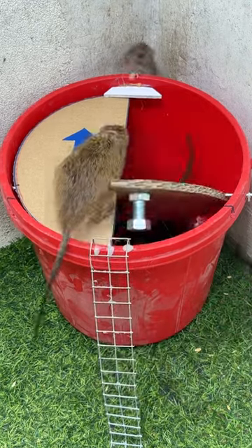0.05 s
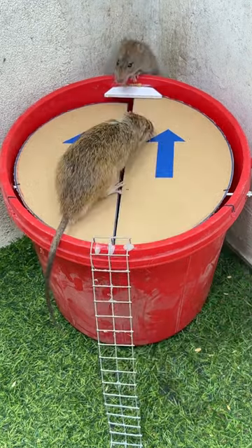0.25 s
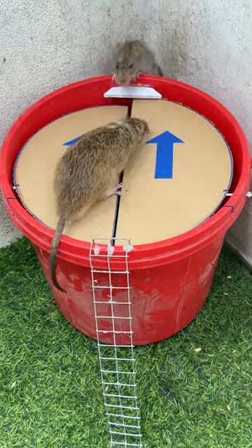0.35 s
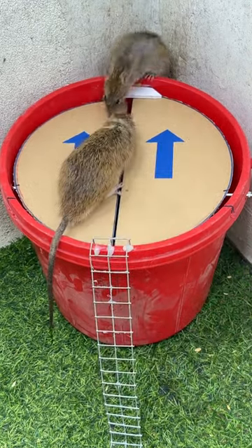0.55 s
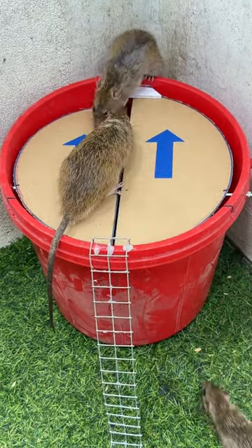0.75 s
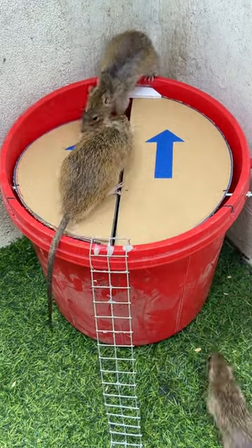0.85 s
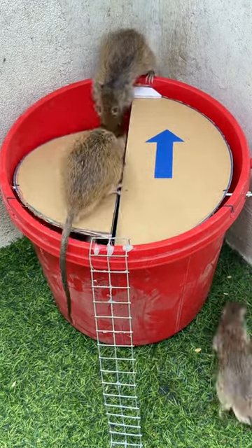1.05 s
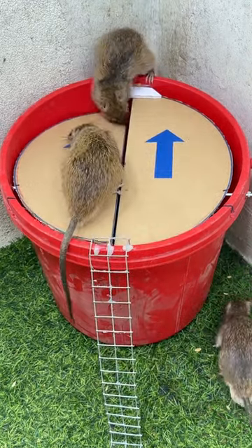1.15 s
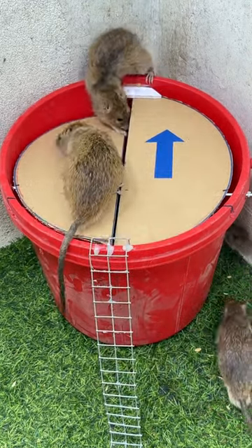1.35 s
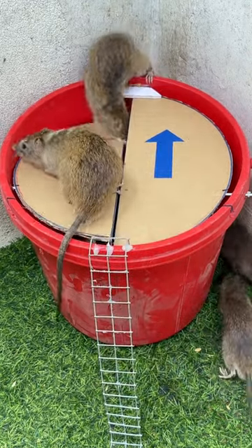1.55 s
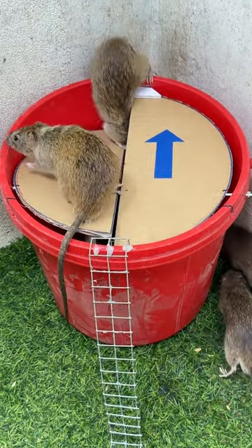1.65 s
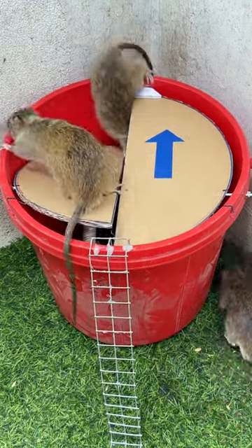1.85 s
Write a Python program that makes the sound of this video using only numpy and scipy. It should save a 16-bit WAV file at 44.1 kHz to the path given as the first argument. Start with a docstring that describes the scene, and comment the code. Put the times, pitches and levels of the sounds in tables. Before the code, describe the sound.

In a walled outdoor corner, a bucket trap's cardboard flap knocks closed and rebounds, its bolt and hinge clattering as the bucket briefly booms. Soft rat steps, claw ticks and rustles follow over a low, steady rumble.

```python
"""A soft knock and a scrape: rats on a bucket trap in a walled corner. The weighted cardboard flap
swings shut and thumps, its bolt and hinge clatter, it rebounds and the plastic bucket booms on.
Then paws pad on the cardboard and claws tick and rustle, over a low outdoor rumble.
Blows are decaying modes; cracks, ticks and rubbing are enveloped, coloured noise."""
import sys
import numpy as np
from scipy import signal
from scipy.fft import rfft, irfft
from scipy.io import wavfile

SR = 44100
rng = np.random.default_rng(int(sys.argv[2]) if len(sys.argv) > 2 else 0)


def wav_record(signal):
    """Record a signal, one row per channel, as 16-bit PCM in the file named by sys.argv[1]."""
    frames = np.transpose(np.atleast_2d(signal))
    bounded = np.clip(frames, -1, 1)
    # unit amplitude maps onto the largest positive 16-bit level
    quanta = np.round(bounded * 32767).astype(np.int16)
    wavfile.write(sys.argv[1], SR, quanta)


N = 83790

# flap landing, rebounding, settling (time [s], board level [dB], bucket level [dB])
FLAP_BLOWS = [(0.0007, -21, -32.2), (0.0505, -66, -30.5), (0.2156, 5, -23), (0.2253, -8, -18),
              (0.26, -15.5, -12.5), (0.2727, -14, -21.5), (0.286, -3.5, -33), (0.3651, -16.5, -28.5),
              (0.3933, -32.5, -26), (0.4972, -52, -32)]
# modes of flap, bucket and wire (frequency [Hz], level [dB], T60 [s])
BOARD_MODES = [(123, -6.5, 0.054), (213.7, 2, 0.052), (247.2, -12, 0.13), (278, -16.0, 0.086)]
BUCKET_MODES = [(86.7, -24, 1), (121.3, -10.5, 0.52), (166.2, -15.5, 0.88), (178, 4, 0.22),
                (235.1, -1.56, 0.22), (299.4, -13.5, 0.68), (528, -17, 0.27), (545, -12.5, 0.15),
                (726.4, -24, 0.17)]
WIRE_MODES = [(2525, 3.5, 0.036), (3920, -14, 0.18), (5540, -18, 0.073), (6150, -7.5, .03),
              (6390, -9, 0.021), (8600, -10, 0.063)]
# bolt and hinge contacts (time [s], level [dB], pitch [Hz])
CLACKS = [(0.049, -28, 2360), (0.2027, -20.5, 1860), (0.208, -19, 1880), (0.217, -13.5, 2072),
          (0.2224, -15, 2120), (0.228, -10, 1517), (0.2402, -15.5, 1557), (0.2524, -18, 2040),
          (0.2558, -16, 2490), (0.2668, -14.5, 2580), (0.2765, -26.5, 1966), (0.325, -28, 1960),
          (1.652, -36.5, 2600), (1.8638, -32.5, 2560)]
# modes of a clack (ratio to pitch, level [dB], T60 [s])
CLACK_MODES = [(0.942, -10, 0.015), (0.998, -0.5, 0.015), (1.28, -22, 0.054), (1.412, -15.5, 0.021),
               (1.65, -13.5, 0.012), (2.4, -20.5, 0.036)]
# wire and claw contacts (time [s], level [dB], tilt [dB/octave])
TICKS = [(0.036, -33, -14.5), (0.2134, -29.5, 3), (0.2217, -26.5, 3), (0.228, -24, 8), (0.255, -33, 3),
         (0.2602, -15, 7.5), (0.2675, -19.5, -4), (0.276, -20, -0.5), (0.326, -25, -13),
         (0.3299, -25.5, 3.5), (0.4329, -31, 1), (0.4925, -34, -0.5), (0.536, -42.5, -5.5),
         (0.944, -44, -3), (0.966, -53, -3), (1.065, -39, 10.5), (1.308, -46.5, 13), (1.652, -47, 8),
         (1.721, -34, 15), (1.8617, -39, -2)]
# steps on the cardboard (time [s], level [dB], pitch [Hz], decay [s])
PAW_STEPS = [(0.001, -25, 247, 0.013), (0.695, -41, 166, 0.052), (1.065, -32, 426, 0.016),
             (1.077, -23, 235, .022), (1.118, -31.5, 232.5, 0.042), (1.164, -35.5, 163, 0.027),
             (1.256, -43, 611, 0.025), (1.335, -34.5, 432, 0.0094), (1.6511, -25, 324, .008),
             (1.694, -39.5, 715, 0.0077), (1.804, -40, 544, 0.039), (1.839, -28, 200, 0.0041)]
# flap on rim; claws and fur on board (time [s], length [s], level [dB], tilt [dB/octave])
SCRAPES = [(0.0, 0.045, -37, 4), (0.049, 0.02, -25.5, 1.5), (0.198, 0.044, -29.5, -2.5),
           (0.255, 0.019, -23, -6), (1.256, 0.059, -49, -3.5), (1.326, 0.057, -37.5, -10),
           (1.694, 0.068, -48.5, -1), (1.80, 0.019, -68, -13)]
RUSTLES = [(0.0, .13, -40, 3.5), (0.134, 0.17, -41, -1.5), (0.704, .10, -51.5, -2), (0.936, 0.049, -55, -2),
           (1.195, 0.45, -62, 0.5), (1.622, 0.14, -50.5, 7), (1.72, 0.084, -53, -0.5),
           (1.795, .028, -37, 2), (1.815, 0.11, -49.5, -0.5)]
# noise spectra (frequency [Hz], relative level [dB])
CRACK_SPECTRUM = [(400, -4), (1000, -2.5), (1700, 3), (2500, 0), (4000, -18.5), (9000, -5), (16000, -60)]
TICK_SPECTRUM = [(800, 1.5), (2500, 0.5), (3300, 3), (4100, -1.5), (4700, 0.5), (6800, 1.5), (9000, -3),
                 (11500, -11), (15500, -10)]
SNAP_SPECTRUM = [(4000, -18), (7000, -12.5), (10000, -6), (13500, 1), (16000, -5.5)]
SCUFF_SPECTRUM = [(100, 9), (300, 10.5), (650, -3), (1000, -24.5), (3000, -30), (8000, -38)]
SCRAPE_SPECTRUM = [(150, 4), (350, 0), (550, 7.5), (800, 6), (1400, -5), (2400, -4.5), (3400, -27.5),
                   (8000, -30.5), (16000, -54)]
RUSTLE_SPECTRUM = [(700, 2), (1500, -1), (2700, 2.5), (4500, -6), (6500, 1.5), (9000, 0.5), (11500, -15.5),
                   (15500, -1.5)]
WALL_SPECTRUM = [(60, -22), (250, 2.5), (600, 0), (2000, -3), (6000, -1.5), (16000, -10.5)]
RUMBLE_SPECTRUM = [(20, -55), (26, -18), (32, 3), (45, 1.5), (70, -3), (110, -10), (170, -9), (300, -13.5),
                   (450, -23), (650, -23), (1100, -33.5), (2800, -39), (4500, -45.5), (7000, -45),
                   (11000, -55.5), (15500, -46.5)]
# stereo width of diffuse sound (frequency [Hz], side level [dB])
SIDE_SPECTRUM = [(50, -68), (170, -32.5), (350, -13), (600, -2.5), (1500, -10.5), (4000, -4.5), (8000, -19),
                 (16000, -25)]
# left microphone port behind the right (frequency [Hz], lag [rad])
PORT_LAG = [(3300, 0), (6000, .8), (8300, 1.93), (11000, 3), (15000, 4)]

TICK_DECAY_S = 0.0028


def flap():
    """Each blow thumps the board and sets the bucket booming."""
    out = 0
    for start_s, board_db, bucket_db in FLAP_BLOWS:
        thump = undb(board_db) * ring(start_s, BOARD_MODES, rise_s=0.0051)
        boom = undb(bucket_db) * ring(start_s, BUCKET_MODES, rise_s=0.0034)
        out += thump + boom
    return out


def hinge(crack_db=-9):
    """Bolt and hinge rattle: each contact cracks and rings at its own pitch."""
    out = 0
    for start_s, db, pitch_hz in CLACKS:
        modes = [(pitch_hz * ratio, mode_db, t60_s) for ratio, mode_db, t60_s in CLACK_MODES]
        crack = undb(crack_db) * noise(CRACK_SPECTRUM) * strike(start_s, rise_s=0.0001, decay_s=0.0034)
        out += undb(db) * (ring(start_s, modes, rise_s=0.0013) + crack)
    return out


def ticks(wire_db=-16):
    """Dry, bright contacts leave a faint ring of wire."""
    out = 0
    for start_s, db, tilt_db_oct in TICKS:
        contact = diffuse(TICK_SPECTRUM, tilt_db_oct) * strike(start_s, 0.00028, TICK_DECAY_S)
        wire = undb(wire_db) * ring(start_s, WIRE_MODES, rise_s=0.00011)
        out += undb(db) * (contact + wire)
    return out


def snap(start_s=0.1458, db=-20.5):
    """Thin, very high click as the flap swings up."""
    return undb(db) * diffuse(SNAP_SPECTRUM) * strike(start_s, 0.00037, TICK_DECAY_S)


def paws(scuff_db=-5.5, rise_s=0.00094):
    """Soft steps: a damped board note and a dull scuff."""
    out = 0
    for start_s, db, pitch_hz, decay_s in PAW_STEPS:
        note = np.sin(2 * np.pi * pitch_hz * since(start_s))
        scuff = undb(scuff_db) * noise(SCUFF_SPECTRUM)
        out += undb(db) * strike(start_s, rise_s, decay_s) * (note + scuff)
    return out


def scrapes():
    """The flap's edge rubs on the rim."""
    return sum(undb(db) * noise(SCRAPE_SPECTRUM, tilt_db_oct) * rub(start_s, length_s)
               for start_s, length_s, db, tilt_db_oct in SCRAPES)


def rustles():
    """Claws and fur brush the board."""
    return sum(undb(db) * diffuse(RUSTLE_SPECTRUM, tilt_db_oct) * rub(start_s, length_s)
               for start_s, length_s, db, tilt_db_oct in RUSTLES)


def walls(x, db=-10.5, t60_s=0.41):
    """Short reverberation of the corner: convolution with decaying noise."""
    tail = diffuse(WALL_SPECTRUM) * strike(0, rise_s=0.0053, decay_s=t60_s / np.log(1000))
    tail /= np.sqrt(np.sum(tail ** 2) / 2)  # mean energy 1 per channel
    return undb(db) * signal.fftconvolve(x, tail, axes=1)[:, :N]


def rumble(db=-40):
    """Steady, low outdoor noise."""
    return undb(db) * diffuse(RUMBLE_SPECTRUM)


def undb(db):
    """Decibels to gain."""
    return 10 ** (np.asarray(db) / 20)


def since(start_s):
    """Seconds since an event, zero before it."""
    return np.maximum(np.arange(N) / SR - start_s, 0)


def onset(start_s, rise_s):
    """Smooth rise from 0 to 1."""
    return 1 - np.exp(-(since(start_s) / rise_s) ** 2)


def strike(start_s, rise_s, decay_s):
    """Quick rise, exponential decay."""
    return onset(start_s, rise_s) * np.exp(-since(start_s) / decay_s)


def ring(start_s, modes, rise_s):
    """Decaying modes set off by one blow."""
    age_s = since(start_s)
    tones = sum(undb(db - 60 * age_s / t60_s) * np.sin(2 * np.pi * hz * age_s) for hz, db, t60_s in modes)
    return onset(start_s, rise_s) * tones


def rub(start_s, length_s, attack_s=0.0037, release_s=0.012, grain_s=0.0017, grain_db=3.5):
    """Attack, grainy hold and release of a sliding contact."""
    attack = np.minimum(since(start_s) / attack_s, 1)
    release = np.exp(-since(start_s + length_s - release_s) / release_s)
    grain = np.interp(since(0) / grain_s, np.arange(N), rng.standard_normal(N))
    return attack * release * undb(grain_db * (grain - 1))


def shape(x, spectrum, tilt_db_oct=0):
    """Filter by a spectrum, tilted above its first point."""
    octave = np.log2(np.maximum(np.arange(N // 2 + 1) * SR / N, 1))
    hz, db = np.array(spectrum).T
    curve_db = np.interp(octave, np.log2(hz), db)
    slope_db = tilt_db_oct * np.maximum(octave - np.log2(hz[0]), 0)
    return irfft(rfft(x) * undb(curve_db + slope_db), N)


def noise(spectrum, tilt_db_oct=0):
    """Coloured noise, rms 1."""
    x = shape(rng.standard_normal(N), spectrum, tilt_db_oct)
    return x / x.std()


def diffuse(spectrum, tilt_db_oct=0):
    """Stereo noise, alike in the bass, wider above."""
    mid = noise(spectrum, tilt_db_oct)
    side = shape(noise(spectrum, tilt_db_oct), SIDE_SPECTRUM)
    return np.array([mid + side, mid - side])


def scene():
    """Trap, reverberation and outdoor rumble."""
    outdoors = rumble()
    trap = flap() + hinge() + ticks() + snap() + paws() + scrapes() + rustles()
    return trap + walls(trap) + outdoors


def record(dry):
    """Two microphone ports, out of phase in the treble; low-pass."""
    top_hz = 16000
    hz, lag_rad = np.array(PORT_LAG).T
    bin_hz = np.arange(N + 1) * SR / (2 * N)
    phase_rad = np.interp(bin_hz, hz, lag_rad) * np.array([[-0.5], [0.5]])
    ports = irfft(rfft(dry, 2 * N) * np.exp(1j * phase_rad))[:, :N]
    lowpass = signal.ellip(10, 0.2, 80, top_hz, fs=SR, output="sos")
    return signal.sosfilt(lowpass, ports)


dry = scene()
out = record(dry)
wav_record(out)
```